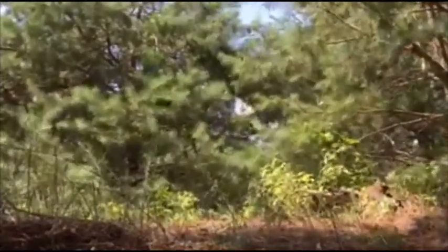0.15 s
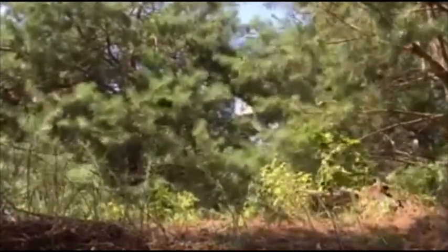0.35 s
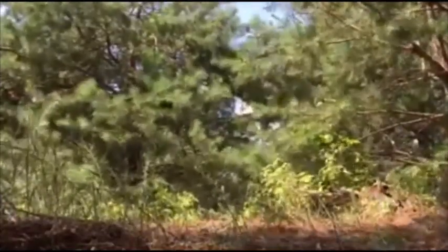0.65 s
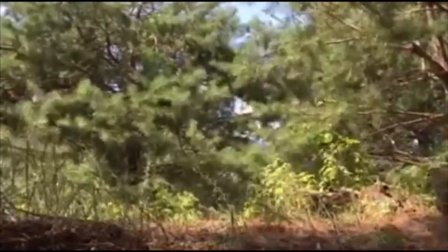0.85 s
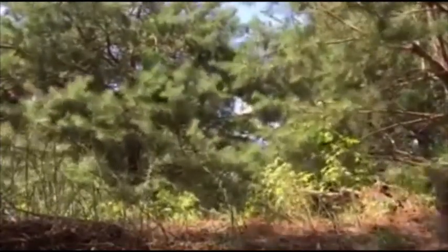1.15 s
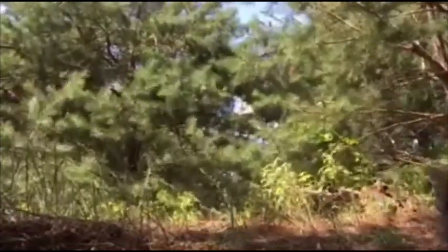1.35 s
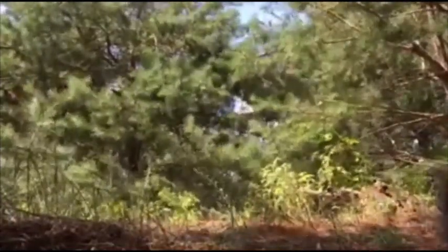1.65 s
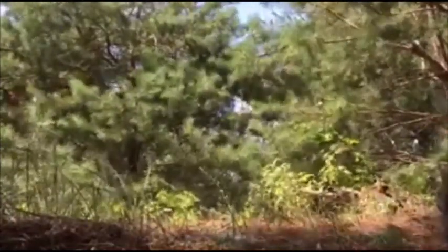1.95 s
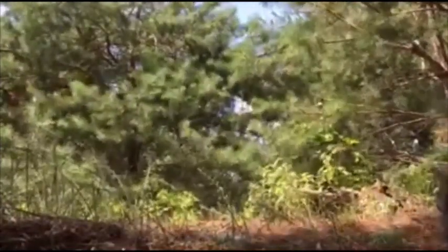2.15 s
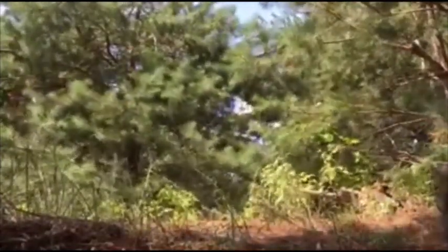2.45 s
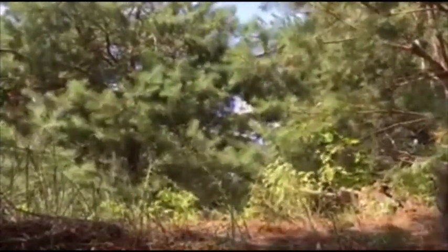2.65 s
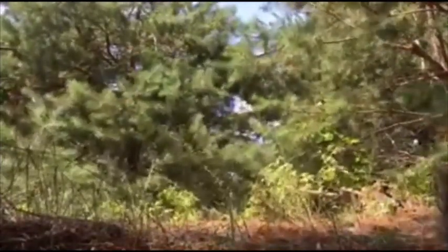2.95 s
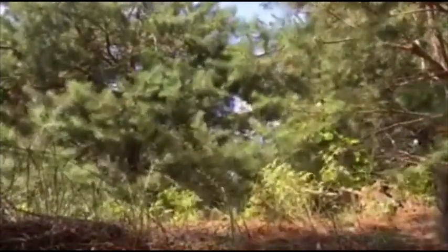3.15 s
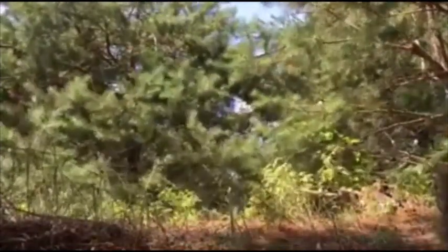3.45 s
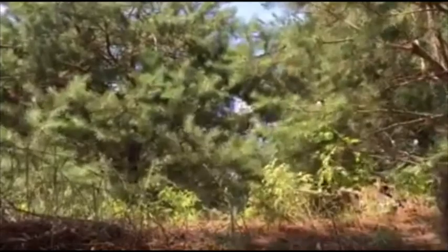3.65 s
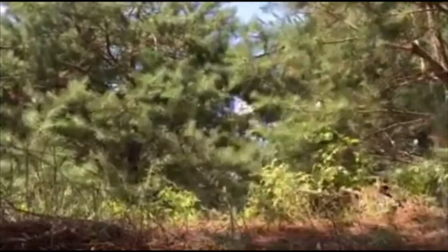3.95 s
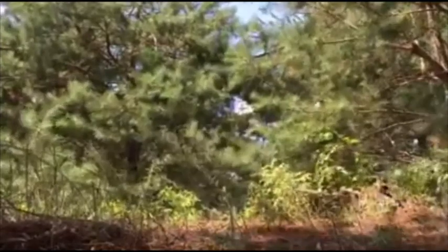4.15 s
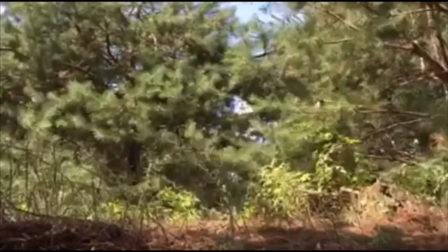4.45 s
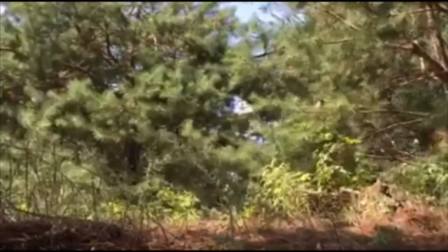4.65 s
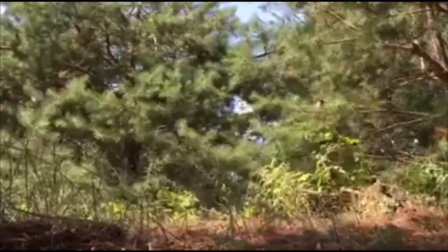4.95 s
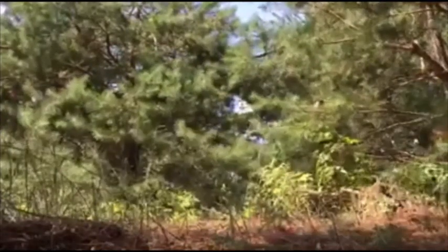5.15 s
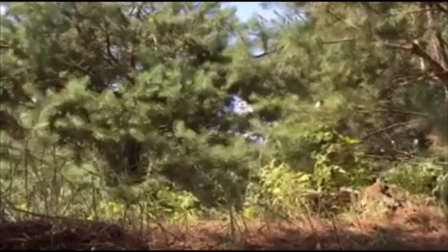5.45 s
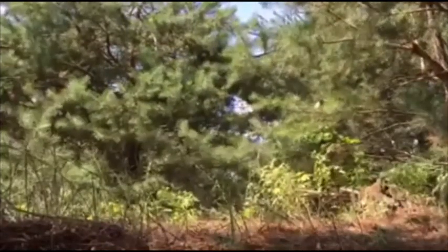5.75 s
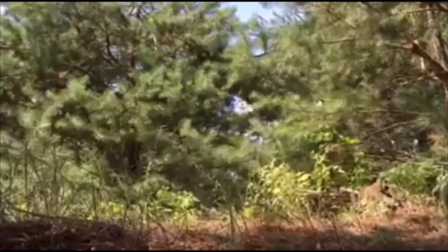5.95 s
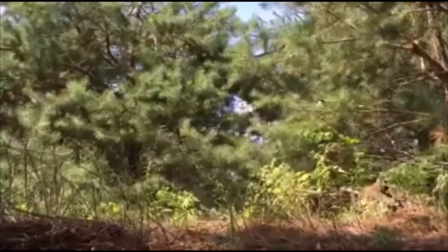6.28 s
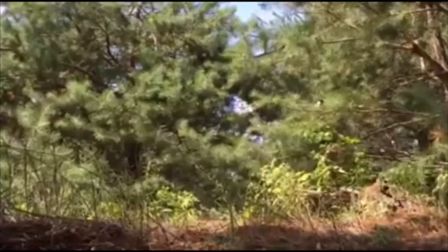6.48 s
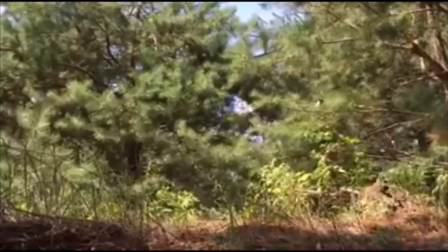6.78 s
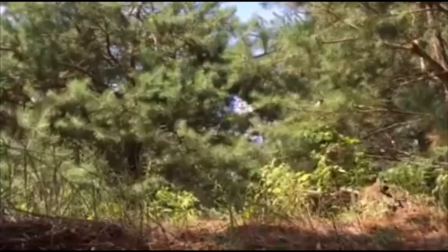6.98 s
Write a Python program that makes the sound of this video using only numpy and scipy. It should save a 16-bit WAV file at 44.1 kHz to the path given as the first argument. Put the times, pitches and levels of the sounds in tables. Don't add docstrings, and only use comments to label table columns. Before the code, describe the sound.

A squirrel is already scolding at the start: long, hoarse, pulsing chucks at about 0, 0.13, 0.3 and 0.5 seconds, each a scooped squeak sagging in pitch with sharp toothy rasp. Broken chucks and low grumbles fill 0.7 to 1.1, with longer chucks near 1.1 and 1.7 and loud shrill yelps around 1.35 and 1.45. From 2.2 to 2.8 come clearer, higher short chucks, another at 3.3, among low grumbles. A double yelp at 3.8 gives way to calmer, softer notes sliding downward, frequent until 4.8, then sparser and less breathy, ending in small arched chirps from 6.8 to 7.1. Wind buffets low, strongest near 0.3 to 0.6 and 1.8 to 2.0, over steady soft needle hiss. Twigs tick mostly between 0.4 and 1.1, and a few near 5.4 to 6. Close, dry woodland sound with faint trunk echoes and patchy treble.

```python
import sys
import numpy as np
from scipy import signal
from scipy.fft import rfft, irfft
from scipy.io import wavfile
from scipy.ndimage import uniform_filter1d

SR = 44100
rng = np.random.default_rng(int(sys.argv[2]) if len(sys.argv) > 2 else 0)


def put_to_file(sound):
    columns = np.atleast_2d(sound).T
    safe = np.clip(columns, -1, 1)
    whole_steps = np.round(safe * 32767)
    wavfile.write(sys.argv[1], SR, whole_steps.astype(np.int16))


def gain_from_db(level_db):
    decades = np.asarray(level_db, float) / 20
    return 10 ** decades


N = 313992
TIME = np.arange(N) / SR
TOP_HZ = 14850


def along(table):
    return np.interp(TIME, *np.transpose(table))


def colour(x, points):
    hz, db = np.transpose(points)
    size = 4096
    bin_hz = np.arange(size // 2 + 1) * SR / size
    log_gain = np.log(gain_from_db(np.interp(np.log(bin_hz + 1), np.log(hz), db, db[0], db[-1])))
    cepstrum = irfft(log_gain)
    cepstrum[1:size // 2] *= 2
    cepstrum[size // 2 + 1:] = 0
    taps = irfft(np.exp(rfft(cepstrum)))
    return signal.fftconvolve(x, taps / np.sqrt(np.sum(taps ** 2)))[:N]


def walk(rate):
    hold = int(SR / rate)
    steps = np.repeat(rng.standard_normal(N // hold + 1), hold)
    x = uniform_filter1d(uniform_filter1d(steps, hold), hold)[:N]
    return x / x.std()


def window(start, length, rise, fall):
    span = slice(max(int((start - rise) * SR), 0), int((start + length + 2 * fall) * SR))
    t = TIME[span] - start
    return span, np.clip(.5 + t / rise, 0, 1) * np.clip(.5 + (length - t) / fall, 0, 1)


FIRST_BEAT_S, FIRST_OPEN_S, BEAT_S, SCOOP = .0175, .013, .025, .82


def chuck(s, length, top_hz, voice_db, rasp_db, hoarse, fade_db, bend, drop_db, rasp_fade_db, rasp_bend):
    rest_hz, sag, sag_bend = 400, .48, .74
    pulse_lift, shut_s = .048, .006
    beats = max(2, round((length - FIRST_BEAT_S) / BEAT_S))
    long = beats > 2
    edge = np.linspace(0, 1, beats + 1)
    hz = top_hz * (rest_hz / top_hz if long else sag) ** edge ** sag_bend
    from_hz, to_hz = hz[:-1].copy(), hz[1:].copy()
    if long:
        step_hz = np.sqrt(from_hz * to_hz)[1:]
        from_hz[1:] = step_hz * (1 - pulse_lift)
        to_hz[1:] = step_hz * (1 + pulse_lift)
    beat = (length - FIRST_BEAT_S) / beats
    count = np.arange(beats)
    spent = (FIRST_BEAT_S + beat * (count + .5)) / length
    first = (s, FIRST_OPEN_S, SCOOP * top_hz, top_hz, voice_db, rasp_db)
    rest = np.c_[s + FIRST_BEAT_S + beat * count, np.full(beats, beat - shut_s * long), from_hz, to_hz,
                 voice_db + fade_db * spent ** bend, rasp_db + drop_db + rasp_fade_db * count ** rasp_bend]
    return np.c_[np.vstack([first, rest]), np.full(beats + 1, hoarse)]


# (t/s, length/s, top f/Hz, voice level/dB, rasp level/dB)
CHATTER = [
    (-.0175, 0.11, 803, -35.5, -27),
    (0.1334, .105, 903, -37, -30),
    (.297, .139, 901.5, -38, -31),
    (0.481, .15, 860, -37, -29.5),
    (1.1314, .152, 956, -37.5, -32),
    (1.7163, .14, 880, -37.5, -30.5),
]


def chatter():
    return [chuck(*c, hoarse=.48, fade_db=-6, bend=3, drop_db=-.85, rasp_fade_db=-11, rasp_bend=.5)
            for c in CHATTER]


# (t/s, length/s, top f/Hz, voice level/dB, rasp level/dB)
BREAKING = [(.683, .034, 961.6, -37.5, -27), (0.7183, .012, 695.4, -38, -41),
            (.836, 0.014, 695, -46, -34.5), (0.8528, 0.018, 788, -36.5, -33.5),
            (0.9741, .04, 1000, -37.5, -32), (1.352, .012, 1716, -57.5, -23), (1.364, .014, 1767, -40, -25),
            (1.5665, .022, 915, -38.5, -47), (1.9157, .04, 980, -37, -33.5), (2.0894, .038, 950, -37, -33),
            (2.632, .016, 809, -37.5, -48), (2.9033, .038, 800, -40, -45), (3.0552, .015, 904, -38.5, -36),
            (3.074, .016, 740.6, -38, -41.5), (3.1953, .013, 879.5, -38.5, -38.5),
            (3.4644, .038, 750, -40.5, -44), (3.609, .039, 1100, -39, -31),
            (4.3381, .013, 930, -37.5, -41.5), (5.4634, .041, 800, -44.5, -52.5),
            (5.909, .02, 830, -45, -58)]


def broken(s, length, top_hz, voice_db, rasp_db):
    slip, dive = .87, .55
    if length < BEAT_S:
        return [(s, length, top_hz, slip * top_hz, voice_db, rasp_db, .3)]
    return [(s, FIRST_OPEN_S, SCOOP * top_hz, top_hz, voice_db, rasp_db, .4),
            (s + FIRST_BEAT_S, length - FIRST_BEAT_S, top_hz, dive * top_hz, voice_db + 1, rasp_db - 5.5, .4)]


# (t/s, rasp over voice level/dB)
BREATH = [
    (3.9, -9),
    (4.25, -15.5),
    (4.55, -5),
    (4.82, -9),
    (5.3, -10),
    (6.1, -21),
]


def note(s, length, start_hz, end_hz, voice_db, settle, arch, fade_db, air_db=0, hoarse=.09):
    parts = max(2, round(length / .012))
    edge = np.linspace(0, 1, parts + 1)
    slide = np.expm1(-settle * edge) / np.expm1(-settle)
    hz = start_hz * (end_hz / start_hz) ** slide * (1 + arch * np.sin(np.pi * edge))
    age = length * edge[:-1]
    rasp_db = voice_db + air_db + np.interp(s, *np.transpose(BREATH)) - 30 * (length < .0335)
    rasp_db = rasp_db - 900 * np.maximum(age - .0076, 0)
    return np.c_[s + age, np.full(parts, length / parts), hz[:-1], hz[1:],
                 voice_db + fade_db * age, rasp_db, np.full(parts, hoarse)]


# (t/s, length/s, start f/Hz, end f/Hz, voice level/dB)
GRUMBLES = [(.7313, .051, 579.4, 330.1, -43), (.875, 0.046, 408.2, 539, -42),
            (1.0175, 0.052, 559.1, 468, -39.5), (1.5896, 0.058, 483.3, 530.5, -43.5),
            (1.9588, 0.059, 497.9, 340, -40), (2.1326, 0.058, 519.3, 420.5, -39.5),
            (2.6533, .046, 521.9, 418.3, -43), (2.9403, 0.048, 509.5, 434, -45.5),
            (3.5065, 0.047, 359.9, 400, -44.5), (3.6511, 0.025, 400, 420, -42),
            (3.6787, 0.034, 370, 379.6, -42), (3.09, .02, 598, 640.6, -43),
            (3.2135, 0.043, 601, 499.3, -41.5), (4.3547, .042, 580.3, 510.6, -38.5),
            (5.361, 0.045, 350, 350, -50), (5.5077, .08, 468.9, 479.7, -42.5),
            (5.5921, .04, 378.8, 400, -47), (5.9293, .082, 400, 440, -42.5)]


def grumbles():
    return [note(*c, settle=-.8, arch=.22, fade_db=-89, air_db=-6.5, hoarse=.27) for c in GRUMBLES]


# (t/s, length/s, top f/Hz, voice level/dB, rasp level/dB)
YELPS = [
    (1.338, .014, 1410, -31.5, -21.5),
    (1.4464, .021, 1851, -32, -20.5),
    (1.4673, .016, 1450, -49, -39),
    (3.774, 0.0134, 1520, -35.5, -24),
    (3.789, 0.02, 1600, -39, -27.5),
    (3.809, 0.015, 1450, -46, -45),
]


def yelp(s, length, top_hz, voice_db, rasp_db):
    return [(s, length, .72 * top_hz, top_hz, voice_db, rasp_db, .16)]


# (t/s, length/s, top f/Hz, voice level/dB, rasp level/dB)
SCOLDING = [
    (2.2469, 0.064, 1104, -34, -29),
    (2.3782, 0.062, 1231, -35, -27),
    (2.505, 0.056, 1400, -34.5, -31.5),
    (2.7641, 0.06, 1302, -35, -30.5),
    (3.329, .054, 1222, -36, -32),
]


def scolding():
    return [chuck(*c, hoarse=.3, fade_db=-16.5, bend=3, drop_db=-8, rasp_fade_db=-24, rasp_bend=.3)
            for c in SCOLDING]


# (t/s, length/s, start f/Hz, end f/Hz, voice level/dB)
FALLING = [
    (3.896, .054, 775, 390.5, -41),
    (4.0504, .036, 914, 444.7, -37),
    (4.167, .023, 791.4, 480.4, -41.5),
    (4.2432, .037, 977, 440, -39),
    (4.4701, .036, 878.5, 457.5, -41),
    (4.6491, .034, 809.6, 480.8, -39),
    (4.9635, .033, 539.4, 384.2, -47),
    (5.2126, .021, 765.4, 520.6, -46.5),
    (5.308, .052, 1192, 331.1, -40.5),
    (6.4235, .037, 1037, 563, -43.5),
]


def falling():
    return [note(*c, settle=.206, arch=.00992, fade_db=-110) for c in FALLING]


# (t/s, length/s, start f/Hz, end f/Hz, voice level/dB)
ROUNDED = [
    (4.5514, .038, 733.7, 600, -38),
    (4.8053, 0.047, 704.3, 374, -43),
    (6.2184, .048, 760, 570, -45.5),
]


def rounded():
    return [note(*c, settle=.306, arch=.3, fade_db=-63.5) for c in ROUNDED]


# (t/s, length/s, start f/Hz, end f/Hz, voice level/dB)
SETTLING = [
    (4.6844, .033, 481.2, 439.6, -45),
    (5.1063, 0.046, 900, 592.6, -45),
    (5.727, .083, 950, 421, -43.5),
    (6.1016, 0.037, 700, 530, -45.5),
]


def settling():
    return [note(*c, settle=2.2, arch=.01006, fade_db=-60) for c in SETTLING]


# (t/s, length/s, start f/Hz, end f/Hz, voice level/dB)
ARCHED = [
    (5.295, .012, 902.6, 1190, -44),
    (6.809, .049, 808, 529.4, -45.5),
    (6.915, .04, 793, 525, -45),
    (7.005, .041, 784, 500, -44.5),
    (7.0929, 0.039, 869, 700, -42),
]


def arched():
    return [note(*c, settle=-2.3, arch=.14, fade_db=-11) for c in ARCHED]


def calls():
    rows = np.vstack(chatter() + [broken(*c) for c in BREAKING] + grumbles() + [yelp(*c) for c in YELPS]
                     + scolding() + falling() + rounded() + settling() + arched())
    return rows[np.argsort(rows[:, 0])].T


OVERTONES_DB = [3, -6, -26, -31.5]
# (f/Hz, level/dB per Hz)
THROAT = [(250, -26.5), (380, -0.5), (600, -4), (1100, 1.5), (1500, -5), (1900, -15.5), (2600, -30.5)]
# (f/Hz, level/dB per Hz)
SOFT_RASP = [(2200, -25.5), (2900, -9.5), (3700, 1.5), (4700, -3), (6200, -6.5), (8000, 0), (10000, -13.5),
             (12800, -12.5), (14500, -9)]
# (f/Hz, level/dB per Hz)
FORCED_RASP = [(1410, -43.5), (2400, -33), (3240, -17.5), (4680, -20), (5660, -18), (6310, -24), (6970, -6),
               (8310, -1), (9040, -14), (10100, -2.5), (12300, -18), (12600, -22), (15000, -15.5)]
# (f/Hz, level/dB per Hz)
CLOSED_RASP = [(1900, -16.5), (2500, -8.5), (3600, 3.5), (4400, -6.5), (6000, -16.5), (15000, -31.5)]
# (t/s, closure 0-1)
LIPS = [
    (3.85, 0),
    (4.2, 0.78),
    (4.9, 0.99),
    (5.2, 0.68),
]


def squirrel():
    soft_db, forced_db = -41.5, -23
    start, length, from_hz, to_hz, voice_db, rasp_db, rough = calls()
    end = start + length
    shut = start[1:] - end[:-1] > .001
    start, end = start + .0015 * np.r_[1, shut], end - .0028 * np.r_[shut, 0]
    voice, rasp, force = np.zeros((3, N))
    for s, d, v, r in zip(start, end - start, voice_db, rasp_db):
        span, gate = window(s, d, rise=.0039, fall=.004)
        voice[span] += gate * gain_from_db(v - 120 * (TIME[span] - s - d / 2))
        span, gate = window(s, d + .002, rise=.0025, fall=.011)
        rasp[span] += gate * gain_from_db(r - 260 * (TIME[span] - s - d / 2))
        force[span] += gate * np.clip((r - soft_db) / (forced_db - soft_db), 0, 1)

    ends = np.maximum.accumulate(np.ravel([start + .00197, end - .002], "F"))
    hoarse = np.interp(TIME, ends, np.repeat(rough, 2))
    glide_hz = np.interp(TIME, ends, np.ravel([from_hz, to_hz], "F"))
    hz = glide_hz * (1 + .12 * hoarse * walk(350))
    phase = 2 * np.pi * np.cumsum(hz) / SR
    folds = np.zeros(N)
    for k, db in enumerate(OVERTONES_DB, 1):
        folds += gain_from_db(db + np.interp(k * hz, *np.transpose(THROAT))) * np.sin(k * phase)
    folds = folds * np.sqrt(2) * gain_from_db(5.4 * hoarse * walk(270))
    breathy = colour(rng.standard_normal(N), THROAT)

    comb = sum(np.cos(k * phase + k * k / 12) * (k * hz < TOP_HZ) for k in range(2, 24))
    snaps = comb * np.sqrt(4 * hz / SR)
    puffs = rng.standard_normal(N) * (1 + .23 * np.cos(phase))
    windy = np.clip(.08 + hoarse, 0, 1)
    air = (np.sqrt(1 - windy) * snaps + np.sqrt(windy) * puffs) * gain_from_db(1.77 * walk(500)) * rasp
    force, lips = np.clip(force, 0, 1), np.clip(along(LIPS), 0, 1)
    teeth = (colour(air * np.sqrt((1 - lips) * (1 - force)), SOFT_RASP)
             + colour(air * np.sqrt((1 - lips) * force), FORCED_RASP)
             + colour(air * np.sqrt(lips), CLOSED_RASP))
    return voice * (np.sqrt(1 - .5 * hoarse) * folds + np.sqrt(.8 * hoarse) * breathy) + teeth


def trunks(x, t60=.1, gap=.0042, wet_db=-21):
    t = TIME[:SR // 2]
    tail = rng.standard_normal(len(t)) * gain_from_db(-60 * t / t60) * (t > gap)
    return gain_from_db(wet_db) * signal.fftconvolve(x, tail / np.sqrt(np.sum(tail ** 2)))[:N]


# (t/s, hold/s, buffeting level/dB)
GUSTS = [
    (0, 0.036, -44),
    (0.303, 0.3, -38.5),
    (0.914, 0.087, -50),
    (1.567, 0.0091, -43),
    (1.78, 0.027, -38),
    (1.99, 0.032, -39.5),
    (2.488, 0.088, -53),
    (4.023, .2, -48.5),
    (5.3, .6, -51),
]


def gusts():
    lull_db, rise, fall = -54, 158, 115
    power = gain_from_db(lull_db) ** 2
    for s, hold, top_db in GUSTS:
        slope_db = np.minimum(rise * (TIME - s), fall * (s + hold - TIME))
        power = power + gain_from_db(top_db + np.minimum(0, slope_db)) ** 2
    return np.sqrt(power)


# (f/Hz, level/dB per Hz)
BUFFET = [(18, -40), (30, -8.5), (70, 5.5), (147, -9), (265, -32.5), (300, -37), (390, -64), (660, -120)]
# (f/Hz, level/dB per Hz)
WOOD = [(88, -33), (150, -1), (459, -6.5), (612, -3), (818, -6.5), (1230, -11.5), (2060, -20.5),
        (8410, -26), (15000, -36.5)]
# (t/s, level/dB)
NEEDLES = [
    (0, 3.5),
    (3, 0),
    (7.12, -1),
]


def wind():
    lumps = colour(rng.standard_normal(N) * gain_from_db(3 * walk(30)), BUFFET) * gusts()
    hiss = colour(rng.standard_normal(N), WOOD) * gain_from_db(-54.5 + along(NEEDLES) + 1.1 * walk(6))
    return lumps + hiss


# (t/s, peak level/dB)
TICKS = [(.117, -64), (0.469, -35.5), (0.666, -32), (0.821, -35), (.961, -38), (1.112, -41), (2.148, -58),
         (1.321, -51), (5.401, -47), (5.838, -45.5), (5.97, -40)]


def twigs():
    gate = np.zeros(N)
    for s, db in TICKS:
        span, shape = window(s, .008, rise=.003, fall=.017)
        gate[span] += shape * gain_from_db(db - 5)
    return colour(gate * rng.standard_normal(N), [(2500, -2.5), (4500, 4), (9000, 7), (14000, 4.5)])


def scene():
    animal = squirrel()
    return (animal + trunks(animal) + wind() + twigs())[None]


THIN_S = [.095, .8, .91, 1.41, 2.0, 2.14, 3.045, 3.13, 3.855, 4.365, 4.51, 4.96, 5.22, 5.6, 6.07, 6.2,
          6.65, 6.73, 6.97]
# (from t/s, to t/s)
DRY_SPELLS = [
    (5.876, 5.928),
    (6.86, 6.906),
]


def thin_out(x, centre_hz=3000, share=.2, depth_db=-20, lead=180):
    bark_s, bark_hz = 1.354, 6800
    hz, s, z = signal.stft(np.pad(x, ((0, 0), (lead, 0))), SR, nperseg=1024)
    step, s, hz = s[1], s - lead / SR, hz[:, None]
    gap_odds = share * np.exp(-(np.log(hz / centre_hz + 1e-9) / .38) ** 2)
    treble_odds = np.interp(hz, [1400, 1500, 5000, 9500], [0, .78, .86, 1])
    patches = rng.random((len(hz) // 5 + 1, len(s) // 3 + 1))
    luck = np.kron(patches, np.ones((5, 3)))[:len(hz), :len(s)]
    brief = np.abs(s - np.c_[THIN_S]).min(axis=0) < step / 2
    spell = sum((s > a) & (s < b) for a, b in DRY_SPELLS)
    treble = hz > 1500
    lost_db, kept_db = -11 * brief - 40 * spell, 5 * (brief + spell) * treble
    db = depth_db * (luck < gap_odds) + np.where(luck < treble_odds, lost_db, kept_db)
    db = db + 7 * (luck - .5) * treble
    emptied = (hz > 300) * (hz < bark_hz) * (abs(hz - 3300) > 200)
    db -= 30 * (abs(s - bark_s) < step / 2) * emptied
    return signal.istft(z * gain_from_db(db), SR, nperseg=1024)[1][:, lead:N + lead]


def low_pass(x):
    return signal.sosfilt(signal.butter(12, 16160, fs=SR, output="sos"), x)


def record(dry):
    top_cut = signal.ellip(8, .2, 45, TOP_HZ, fs=SR, output="sos")
    kept = signal.sosfilt(top_cut, thin_out(dry))
    return low_pass(kept)


dry = scene()
out = record(dry)
put_to_file(out)
```